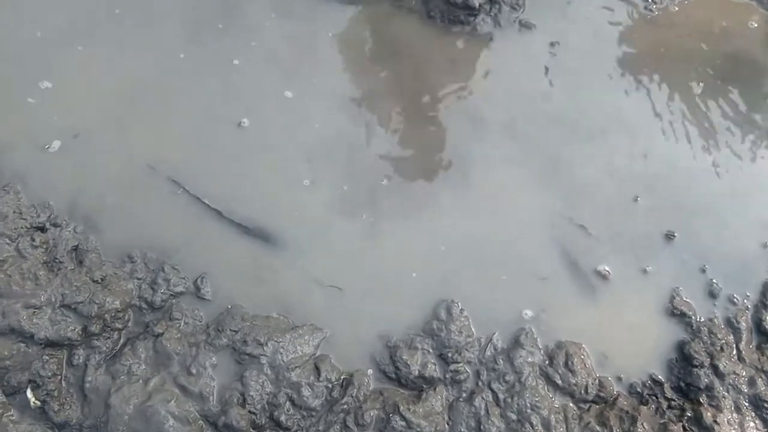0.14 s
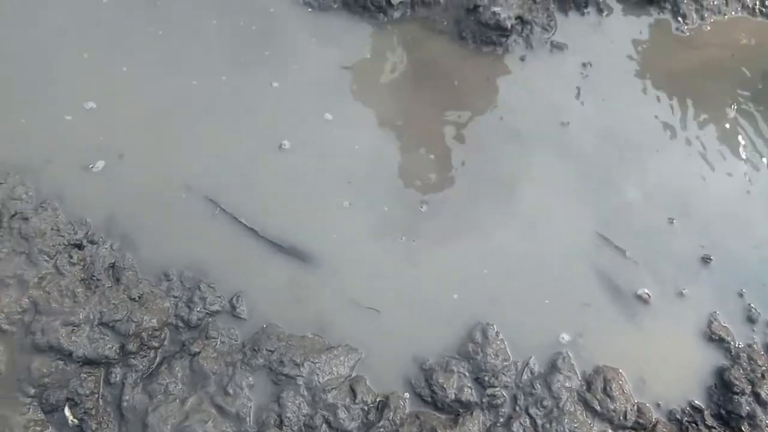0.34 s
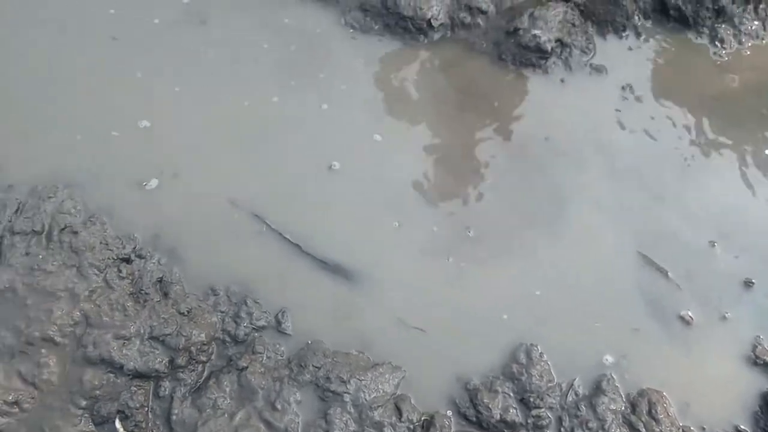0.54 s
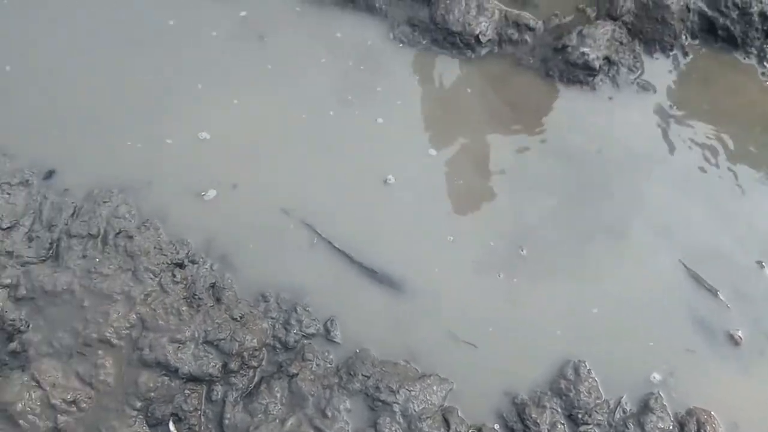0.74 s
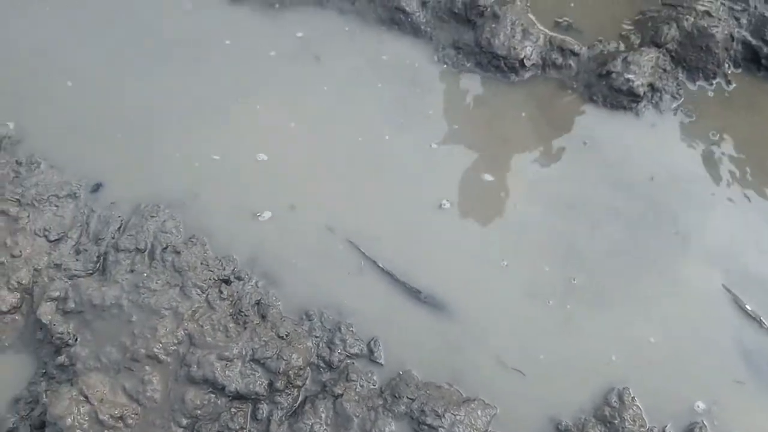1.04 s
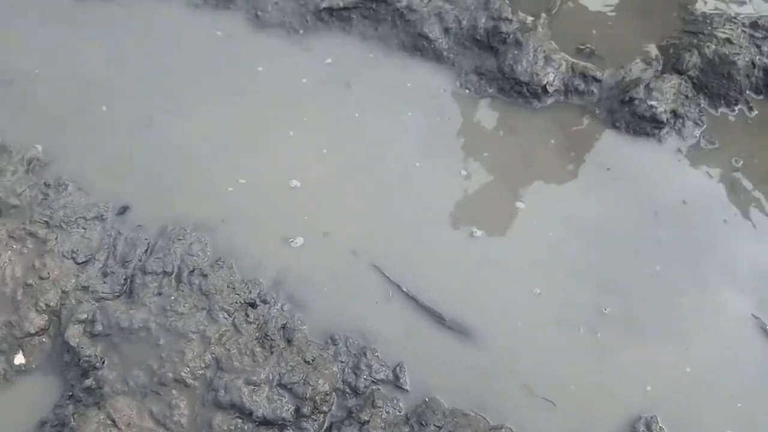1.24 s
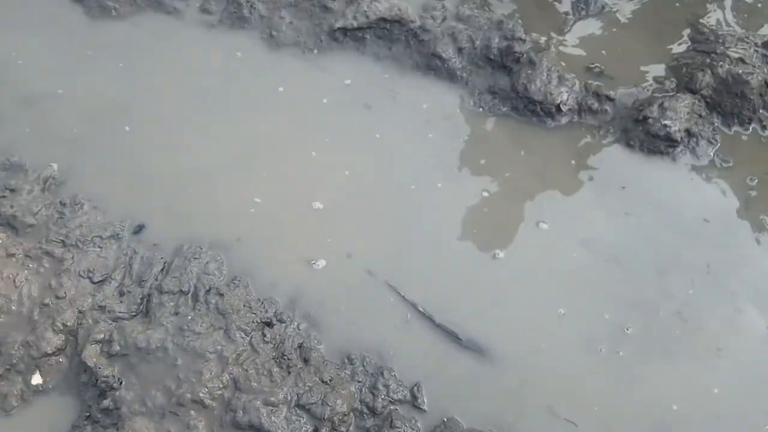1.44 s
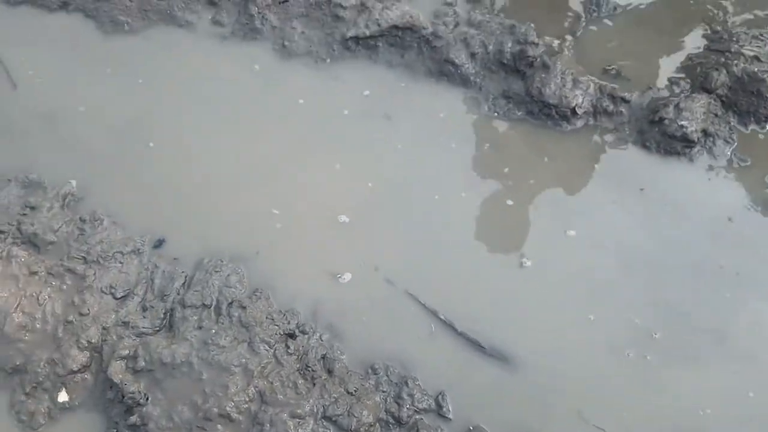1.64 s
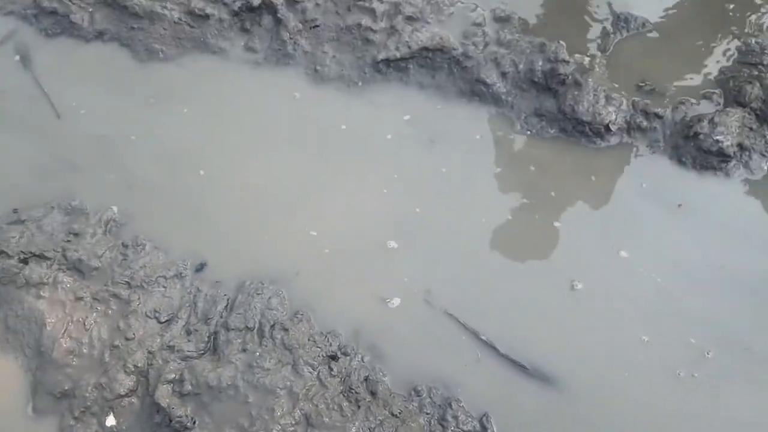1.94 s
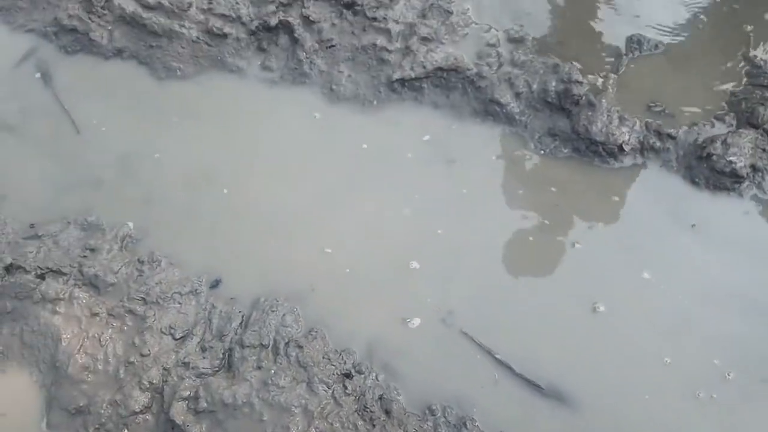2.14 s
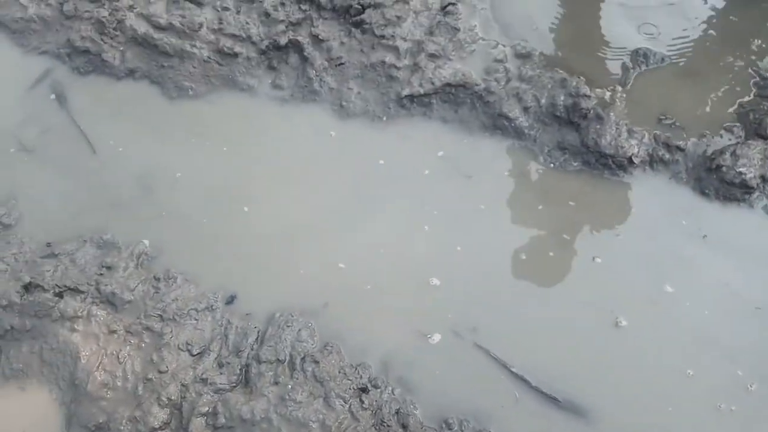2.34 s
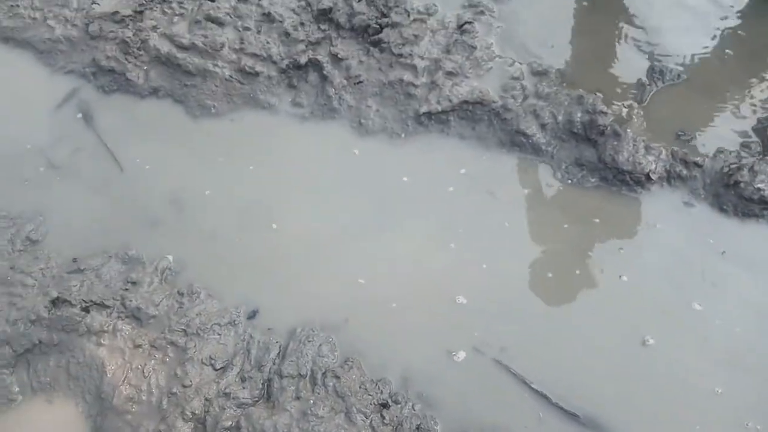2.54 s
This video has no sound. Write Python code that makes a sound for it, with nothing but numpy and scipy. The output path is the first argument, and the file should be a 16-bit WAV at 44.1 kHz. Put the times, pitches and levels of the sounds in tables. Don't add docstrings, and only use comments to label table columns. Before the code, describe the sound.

Muddy water sloshes early, splats hard around half a second, then glugs and patters through the middle, splashes strongest near two seconds and dies away in small drips; open air, small hand-held microphone.

```python
import sys
import numpy as np
from scipy import signal
from scipy.fft import rfft, irfft
from scipy.io import wavfile

SR = 44100
rng = np.random.default_rng(int(sys.argv[2]) if len(sys.argv) > 2 else 0)


def invert_db(level):
    return 10 ** (np.asarray(level, dtype=float) / 20)


def unload_audio(sound):
    columns = np.transpose(np.atleast_2d(sound))
    steps = np.round(np.clip(columns, -1, 1) * 32767)
    wavfile.write(sys.argv[1], SR, steps.astype(np.int16))


N = 119070

BUBBLE_S, BUBBLE_RISE = 0.016, 0.1


def rms_one(x):
    return x / np.sqrt(np.mean(x ** 2) + 1e-20)


def colour(x, points):
    hz = np.maximum(np.arange(N // 2 + 1) * SR / N, 1)
    at, db = np.transpose(points)
    return irfft(rfft(x) * invert_db(np.interp(np.log(hz), np.log(at), db)), N)


def drift(rate_hz):
    r = np.exp(-2 * np.pi * rate_hz / SR)
    noise = rng.standard_normal(N + SR)
    return rms_one(signal.lfilter([1], [1, -2 * r, r * r], noise)[SR:])


def filtered(x, order, edge_hz, kind):
    return signal.sosfilt(signal.butter(order, edge_hz, kind, fs=SR, output="sos"), x)


def add(out, start_s, sound):
    i = int(start_s * SR)
    out[i:i + len(sound)] += sound[:max(N - i, 0)]


def ring(clicks, hz, t60_s):
    r, w = invert_db(-60 / (t60_s * SR)), 2 * np.pi * hz / SR
    return signal.lfilter([0, np.sin(w)], [1, -2 * r * np.cos(w), r * r], clicks + 1e-18)


def grains(rate, spread_db, low_hz, high_hz, cycles, count):
    sizes = invert_db(spread_db * np.minimum(rng.exponential(1, N), 4)) * rng.choice([-1, 1], N)
    sizes = sizes * (rng.random(N) < rate / SR)
    dealt = rng.integers(0, count, N)
    total = np.zeros(N)
    for k, hz in enumerate(np.geomspace(low_hz, high_hz, count)):
        total += np.sqrt(hz) * ring(sizes * (dealt == k), hz, cycles / hz)
    return rms_one(total)


def surge_gain():
    # start_s, hold_s, level_db, ebb_db_per_s, low_wash_db
    pushes = [(0.0, 0.012, -44.5, 52.5, -2), (0.194, 0.17, -40, 110, -4.5), (0.243, 0.093, -34.5, 60, 2),
              (0.301, 0.036, -33.5, 316, 9), (0.407, 0.015, -36, 153, 0.5), (0.51, 0.019, -36.5, 156, -4.5),
              (0.603, 0.2, -47, 14.5, -5.5), (0.859, 0.043, -46.5, 95, 7.5), (1.17, 0.17, -41.5, 137, 3.5),
              (1.379, 0.059, -44, 68, -9), (1.697, 0.02, -44, 91, -6), (1.759, 0.058, -37, 57, 1.5),
              (1.855, .11, -34.5, 215, -1.5), (2.042, 0.014, -33.5, 163, -10), (2.288, 0.089, -50, 36, 7.5),
              (2.649, .05, -58, 52, -4)]
    rise_s, still_db = 0.006, -62
    t = np.arange(N) / SR
    flow = deep = invert_db(2 * still_db)
    for start, hold, db, ebb, depth_db in pushes:
        rise = np.clip((t - start) / rise_s + 1, 0, 1) ** 2
        power = rise * invert_db(2 * (db - ebb * np.maximum(t - start - hold, 0)))
        flow = flow + power
        deep = deep + power * invert_db(2 * depth_db)
    return np.sqrt(flow), np.sqrt(deep)


def spray(flow, deep):
    # pitch_hz, level_db
    spray_tone = [(200, -14), (400, -9.5), (1000, -6.5), (2000, -3), (3500, -0.5), (5000, -3.5), (7000, -6)]
    hiss_db, droplet_db, patchy_db, lumpy_db = 1.5, -1.5, 2.5, 1.2
    wash_hz = 2100
    lumps = drift(60)
    edges = 100 * 2 ** np.arange(0, 7.6, 0.5)
    white = rng.standard_normal((2, N))
    hiss = np.zeros(N)
    for k, (low_hz, high_hz) in enumerate(zip(edges, edges[1:])):
        band = filtered(white[k % 2], 2, [low_hz, high_hz], "band")
        hiss += band * invert_db(patchy_db * drift(21.6))
    drops = grains(4000 * invert_db(3 * lumps), 2.6, 292.3, 16020, cycles=45, count=48)
    mix = invert_db(hiss_db) * rms_one(hiss) + invert_db(droplet_db) * drops
    water = rms_one(colour(mix, spray_tone)) * invert_db(lumpy_db * lumps)
    low = filtered(water, 2, wash_hz, "low")
    return flow * (water - low) + deep * low


def splats():
    # start_s, peak_db, pitch_hz, t60_s
    landings = [(0.4825, -20, 4640, 0.11), (0.5170, -13.5, 3170, 0.057), (0.8885, -39, 1570, 0.065),
                (0.986, -30, 1830, 0.029), (1.1538, -28.5, 2340, 0.1), (1.1985, -24.5, 3700, 0.073),
                (1.2361, -26.5, 2230, 0.14), (1.3386, -24.5, 3730, 0.025), (1.3836, -21.5, 4300, 0.044),
                (1.4057, -26, 5330, 0.067), (1.4174, -28, 6000, 0.019), (1.4444, -26, 5530, 0.04),
                (1.4937, -29, 4500, 0.13), (1.5106, -28, 3380, 0.061), (1.5298, -27, 5000, 0.035),
                (1.553, -30.5, 5800, 0.016), (1.566, -33, 3690, 0.054), (1.6841, -32, 3900, 0.044),
                (1.7544, -26.5, 3380, 0.13), (2.0404, -10.5, 4100, 0.056), (2.0622, -14.5, 4170, 0.058),
                (2.0935, -23.5, 3600, 0.033), (2.1817, -30.5, 3840, 0.039), (2.2935, -35.5, 3500, 0.083),
                (2.3401, -27.5, 4040, 0.15)]
    # start_s, peak_db, pitch_hz, t60_s
    more_landings = [
        (2.2116, -37.5, 2150, 0.12),
        (2.3595, -25.5, 3730, 0.048),
        (2.387, -26, 4220, 0.029),
        (2.4154, -29, 4120, 0.054),
        (2.4667, -33, 3860, 0.018),
        (2.5831, -38.5, 2520, 0.028),
        (2.6524, -36.5, 2500, 0.19),
        (2.6744, -35, 4000, 0.14),
    ]
    level_db, ring_db, crack_db = -0.5, 2, 3
    attack_s, crack_t60_s = 0.00084, 0.025
    thin_db = 6.5
    rows = list(landings) + list(more_landings)
    out, t = np.zeros(N), np.arange(SR // 5) / SR
    for start, db, hz, t60 in rows:
        noise = rng.standard_normal(len(t))
        low_hz = min(1000 * 2 ** (-(db + 12.5) / thin_db), 0.45 * hz)
        body = filtered(noise, 2, low_hz, "high")
        cavity = invert_db(ring_db) * rms_one(ring(noise, hz, 14 / hz))
        crack = invert_db(crack_db - 60 * t / crack_t60_s) * body
        sound = invert_db(-60 * t / t60) * (body + cavity) + crack
        sound = sound * np.minimum(t / attack_s, 1)
        peak = np.abs(signal.lfilter([0.5, 0.5], [1], sound)).max()
        add(out, start, invert_db(db + level_db) * sound / peak)
    return out


def glug(db, hz, length_s, rise_hz):
    attack, fade_db = 0.27, 21.5
    life = np.arange(int(2.5 * length_s * SR)) / SR / length_s
    swell = np.sin(np.pi / 2 * np.minimum(life / attack, 1)) * invert_db(db - fade_db * life ** 2)
    return swell * np.sin(2 * np.pi * np.cumsum(hz + rise_hz * life ** 2) / SR)


def glugs():
    # start_s, peak_db, start_pitch_hz, length_s
    pockets = [(0.482, -32, 287, 0.0094), (0.496, -62, 1400, 0.021), (0.782, -43, 170.5, 0.066),
               (0.805, -37.5, 1000, 0.017), (0.827, -28.5, 278, 0.013), (0.837, -39, 310, 0.025),
               (0.86, -45, 312, 0.035), (.88, -29, 619, 0.013), (.881, -29.5, 1033, .011),
               (0.891, -30, 546, 0.019), (0.879, -42, 273, 0.032), (0.911, -44, 1000, 0.011),
               (0.949, -43, 1000, 0.022), (0.974, -29.5, 830, 0.0066), (0.979, -36.5, 704, 0.035),
               (1.049, -39.5, 1240, 0.012), (1.13, -35.5, 1000, 0.0068), (1.174, -34, 613, 0.011),
               (1.201, -31, 553, 0.037), (1.21, -40, 235, 0.024), (1.248, -33, 1040, 0.0087),
               (1.253, -37.5, 269, 0.036), (1.288, -31, 252, 0.012), (1.305, -28.5, 325, .032),
               (1.386, -38.5, 456, 0.012), (1.587, -45.5, 907, 0.029), (2.041, -25, 1287, 0.0095),
               (2.042, -41, 307, 0.02)]
    # start_s, peak_db, start_pitch_hz, length_s
    more_glugs = [(4.5, -41, 600, 0.0374), (2.32, -42, 1115, 0.0098), (2.335, -31.5, 1100, 0.016),
                  (2.337, -35, 337, 0.021), (2.355, -41, 1350, 0.019), (2.361, -24, 538, 0.019),
                  (2.383, -45, 960, 0.013), (2.408, -47, 1300, 0.015), (2.411, -35, 1085, 0.021),
                  (2.441, -33, 1000, 0.012), (2.452, -40.5, 1390, 0.019), (2.652, -42, 1040, 0.01),
                  (2.214, -46, 1420, 0.014), (.992, -41.5, 1850, 0.015), (1.286, -33.5, 2030, 0.016),
                  (1.52, -37.5, 1970, 0.021), (2.156, -37.5, 4040, 0.0075), (1.06, -41, 1860, .012),
                  (1.022, -48, 2800, 0.024), (2.57, -46.5, 640, 0.018), (2.678, -45, 755, 0.016),
                  (2.5, -42, 1380, .008)]
    rise_hz, rough = 90, 0.42
    swarm_count, swarm_db, swarm_s, swarm_octaves = 5, -15, 0.05, 3
    out = np.zeros(N)
    for start, db, hz, length in list(pockets) + list(more_glugs):
        add(out, start, glug(db, hz, length, rise_hz))
        for when, pitch, size in rng.random((swarm_count, 3)):
            small_hz = hz * 2 ** (swarm_octaves * pitch)
            small_db = db + swarm_db * (0.5 + size)
            small_s = BUBBLE_S * (250 / small_hz) ** 0.5
            small = glug(small_db, small_hz, small_s, BUBBLE_RISE * small_hz)
            add(out, start + swarm_s * (when - 0.2), small)
    return out * (1 + rough * drift(160))


def ticks():
    # start_s, peak_db, pitch_hz
    droplets = [(1.4065, -23, 5290), (0.0921, -32.5, 3110), (0.195, -36, 2100), (0.2463, -37, 2570),
                (0.2637, -22, 2730), (.4838, -15.5, 6580), (0.488, -29.5, 4970), (0.5103, -23, 3260),
                (0.518, -26, 1580), (.6195, -34.5, 2770), (0.7724, -35, 2870), (0.9743, -32.5, 3090),
                (1.096, -40, 3630), (1.1346, -38, 3070), (.891, -30.5, 3600), (.987, -30.5, 4630),
                (0.898, -30.5, 3020), (1.1539, -27.5, 2780), (1.1593, -33, 1940), (1.178, -27, 3370),
                (1.181, -31, 2180), (1.193, -33, 3300), (1.213, -26, 4750), (1.2337, -32.5, 1245),
                (1.264, -31, 5500), (1.333, -29, 3570), (1.389, -35, 2670), (1.395, -31, 5330),
                (1.402, -27, 3680), (1.411, -29, 3500), (1.425, -28.5, 5500), (1.453, -37, 1780),
                (1.4673, -31, 4170), (1.476, -28.5, 3650), (1.485, -37.5, 1520), (1.505, -36, 5500),
                (1.513, -33, 1400), (1.618, -57, 3850), (1.6676, -45, 3350), (1.71, -32, 3950),
                (1.716, -29, 5300), (2.041, -12.5, 6540), (2.0615, -14, 4400), (2.066, -19, 3150),
                (2.2474, -40, 6100), (2.2767, -38, 3400), (2.3212, -27.5, 3320), (2.362, -24, 4860),
                (2.452, -36, 3670), (0.4856, -29.5, 1690), (1.3838, -20, 3670)]
    # start_s, peak_db, pitch_hz
    pricks = [
        (0.152, -25.5, 10400),
        (0.4825, -10.5, 11600),
        (1.453, -25, 12100),
        (1.4683, -20, 10600),
        (1.5394, -27, 9490),
        (1.554, -23, 9200),
        (1.7649, -21, 9640),
        (2.127, -27, 10000),
        (2.2094, -26, 11500),
    ]
    ring_cycles, attack_cycles, rise = 48, 3, 0.03
    snap_db, snap_t60_s = -11, 0.02
    out, t = np.zeros(N), np.arange(SR // 25) / SR
    for start, db, hz in list(droplets) + list(pricks):
        life = t * hz / ring_cycles
        tone = invert_db(-60 * life) * np.sin(2 * np.pi * hz * t * (1 + rise * life))
        noise = rng.standard_normal(len(t))
        snap = rms_one(filtered(noise, 2, [0.7 * hz, min(1.4 * hz, 16000)], "band"))
        sound = tone + invert_db(snap_db - 60 * t / snap_t60_s) * snap
        add(out, start, invert_db(db) * np.minimum(t * hz / attack_cycles, 1) * sound)
    return out


def bubbles(flow):
    count, level_db, spread_db = 500, -9, 4
    low_hz, octaves = 1000, 2.7
    out = np.zeros(N)
    for when, pitch, size, slow in rng.random((count, 4)):
        hz = low_hz * 2 ** (octaves * pitch)
        db = level_db - spread_db * np.log(size + 0.11)
        length_s = BUBBLE_S * (0.5 + slow) * (1000 / hz) ** 0.5
        add(out, when * N / SR, glug(db, hz, length_s, BUBBLE_RISE * hz))
    return flow * out


def handling():
    # start_s, peak_db, pitch_hz
    bumps = [(0.406, -48, 88), (0.698, -52, 73.5), (0.976, -49, 100), (1.017, -50, 99), (1.091, -53.5, 95),
             (1.377, -48.5, 90.5), (1.506, -48, 99), (2, -45, 84.5), (2.027, -39, 105), (2.105, -43, 85.25),
             (2.271, -44, 110), (2.238, -53, 90), (2.345, -48, 80), (1.899, -53, 70.4), (2.17, -48.5, 111),
             (2.388, -41.5, 128), (2.409, -44, 83.4)]
    # pitch_hz, level_db
    rumble_tone = [(30, -11.5), (55, 0), (85, 3.5), (130, 1), (200, -2), (400, -22)]
    bump_db, bump_t60_s, attack_s, rumble_db = 3, 0.068, 0.011, -63.5
    out, t = np.zeros(N), np.arange(SR // 4) / SR
    for start, db, hz in bumps:
        fade = invert_db(db + bump_db - 60 * t / bump_t60_s) * np.minimum(t / attack_s, 1)
        add(out, start, fade * 2 * np.sin(2 * np.pi * hz * t))
    rumble = rms_one(colour(rng.standard_normal(N), rumble_tone))
    return out + invert_db(rumble_db + 3.4 * drift(8)) * rumble


def scene():
    flow, deep = surge_gain()
    water = spray(flow, deep) + splats() + glugs() + ticks()
    water = water + bubbles(np.sqrt(flow * deep))
    water = filtered(water, 3, 170, "high")
    return (water + handling())[None]


def band_limit(x):
    return signal.sosfilt(signal.butter(12, 16330, fs=SR, output="sos"), x)


def record(dry):
    # pitch_hz, level_db
    mic_tone = [(6300, 1), (6900, -5.5), (7800, -23.5), (9000, -27), (13800, -28.5), (15000, -23),
                (15500, -21), (16000, -61)]
    hiss_tone = [(5000, -60), (9000, 9.5), (15000, 19.5)]
    own = invert_db(-62.5) * colour(rng.standard_normal(N), hiss_tone)
    heard = colour(dry[0] + own, mic_tone)
    mix = 0.39 * np.tanh(heard / 0.41)[None]
    return band_limit(mix)


dry = scene()
out = record(dry)
unload_audio(out)
```